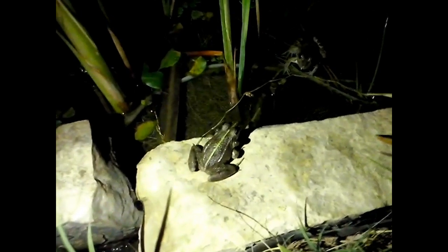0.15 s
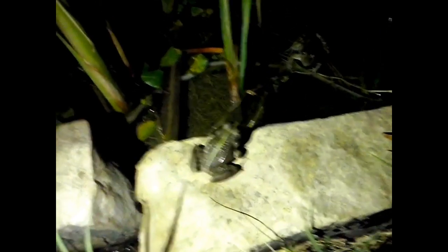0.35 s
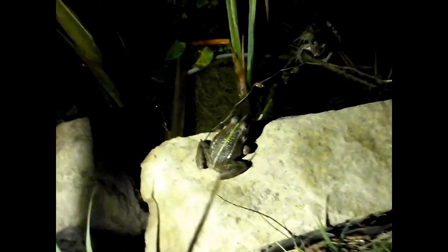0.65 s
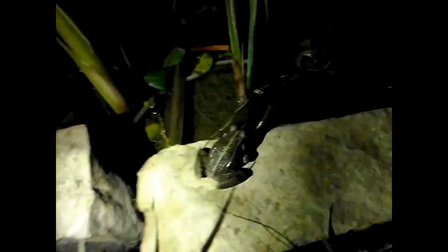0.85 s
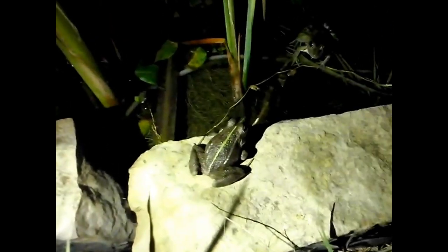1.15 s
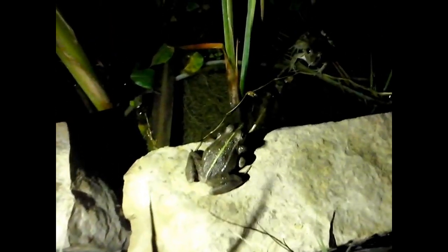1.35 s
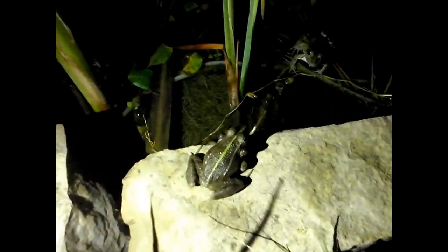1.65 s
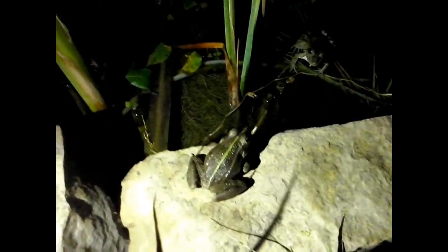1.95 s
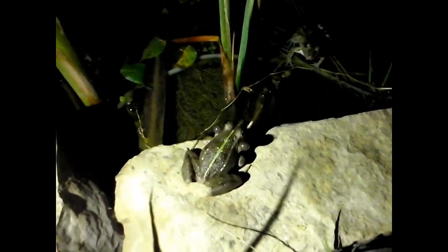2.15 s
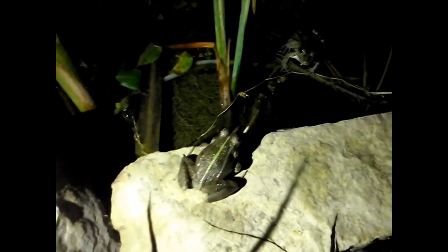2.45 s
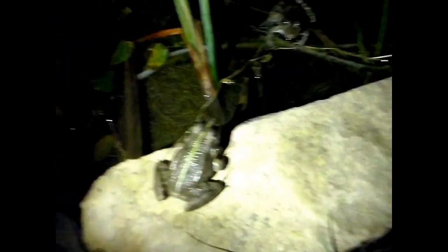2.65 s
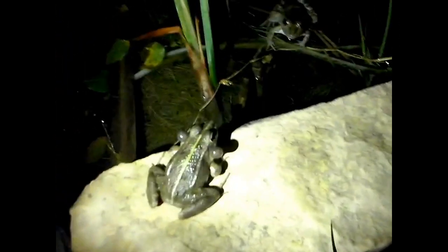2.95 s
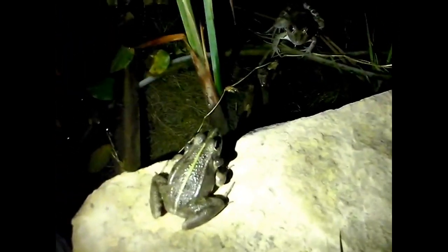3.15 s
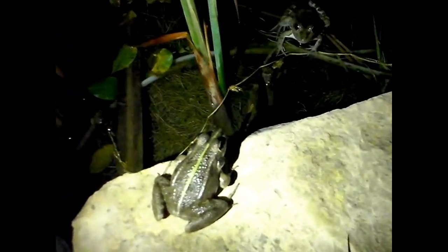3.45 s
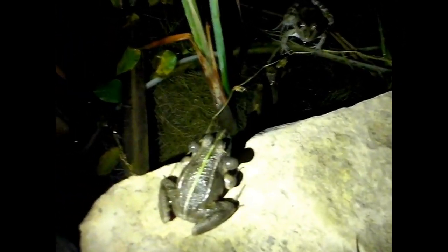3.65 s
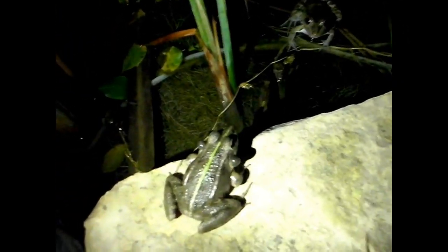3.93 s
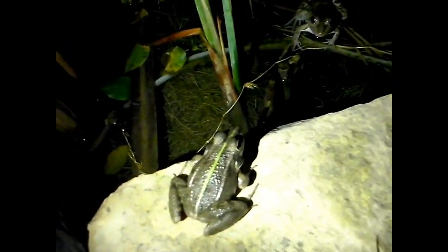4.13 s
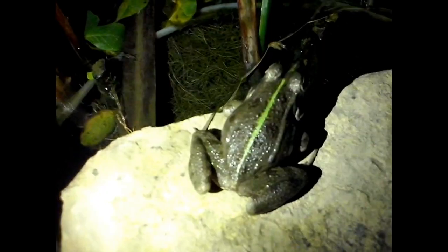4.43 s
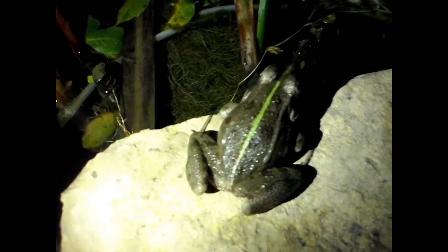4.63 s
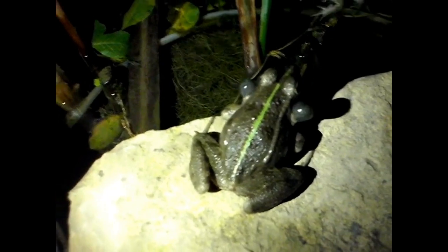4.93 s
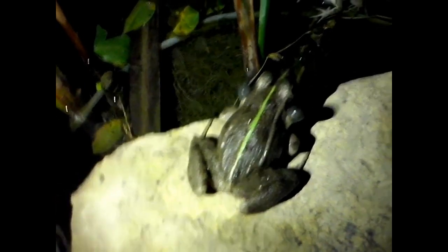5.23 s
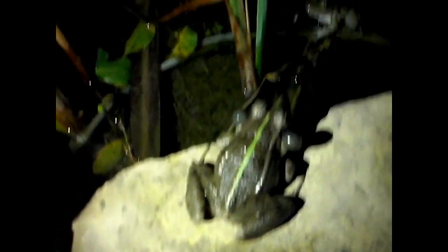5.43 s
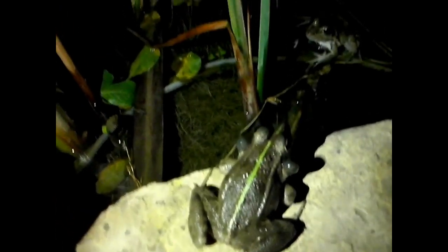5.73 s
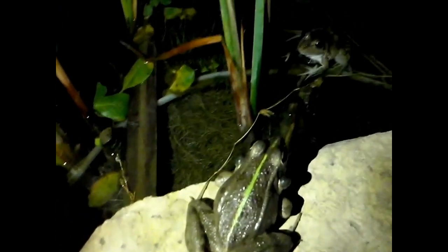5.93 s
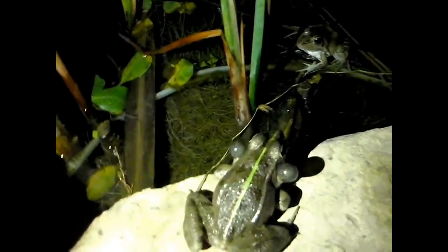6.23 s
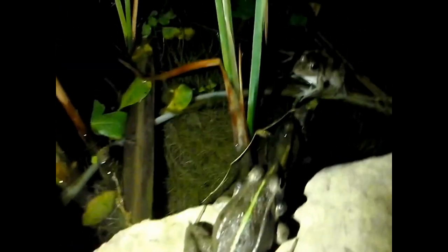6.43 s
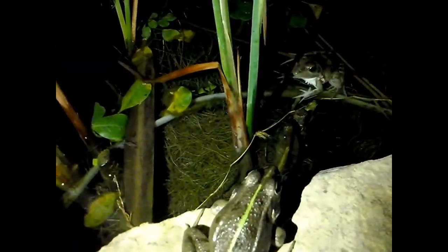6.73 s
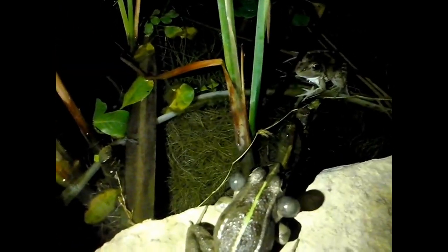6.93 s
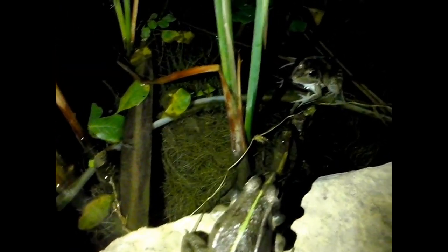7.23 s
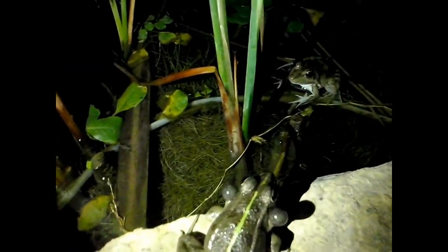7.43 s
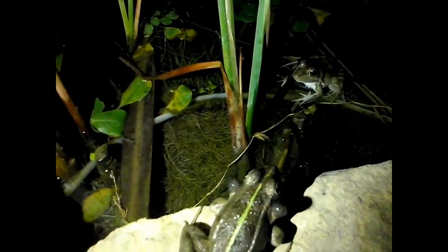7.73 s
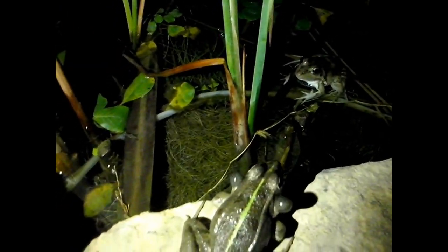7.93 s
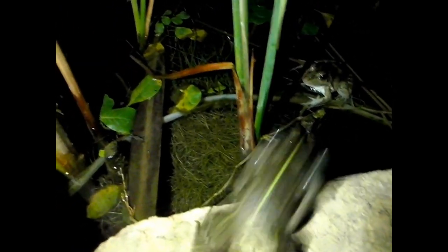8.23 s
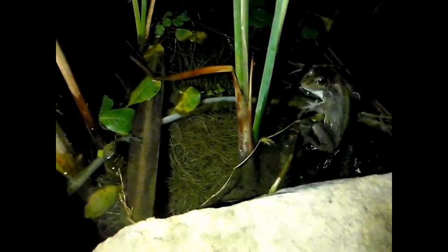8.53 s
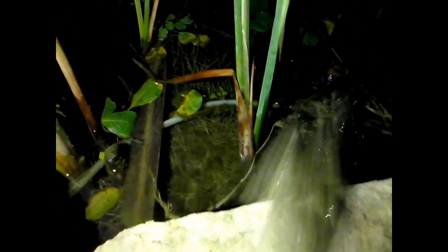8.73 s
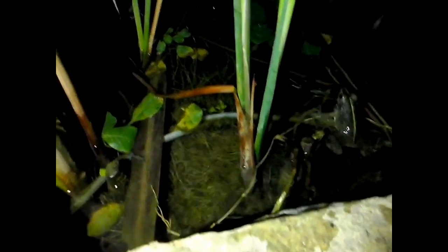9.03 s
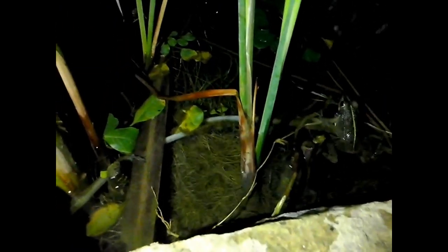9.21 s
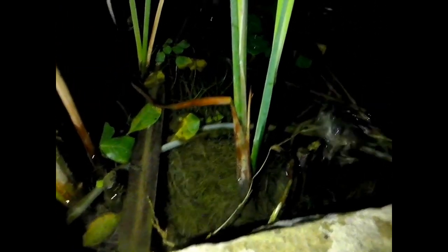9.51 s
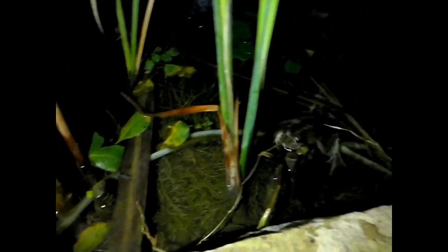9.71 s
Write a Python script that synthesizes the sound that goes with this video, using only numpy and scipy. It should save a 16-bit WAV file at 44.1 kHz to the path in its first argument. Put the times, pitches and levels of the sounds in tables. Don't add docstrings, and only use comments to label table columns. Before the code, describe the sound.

Loud, dry frog rattles repeat at uneven intervals over a constant buzzing mole-cricket trill. Early croaks are brief and throaty; later ones are longer, sharper and more forceful. Tiny water ticks and faint frog calls come from around the pond, with distant motors humming low. Outdoors, close, with short scattered echoes, a gritty overloaded microphone, metallic treble, and automatic gain dipping and raising the background.

```python
import sys
import numpy as np
from scipy import signal
from scipy.fft import rfft, irfft, next_fast_len
from scipy.io import wavfile
from scipy.ndimage import uniform_filter1d, map_coordinates

SR = 44100
rng = np.random.default_rng(int(sys.argv[2]) if len(sys.argv) > 2 else 0)


def dump(signal):
    limited = np.clip(np.atleast_2d(signal).T, -1, 1)
    pcm = np.round(limited * 32767).astype(np.int16)
    wavfile.write(sys.argv[1], SR, pcm)


def voltage_ratio(decibels):
    exponent = np.asarray(decibels, float) / 20
    return 10 ** exponent


N = 435266


def unit(x):
    return x / np.sqrt(np.mean(x ** 2) + 1e-20)


def along(points, hz):
    f, v = np.transpose(points)
    return np.interp(np.log(hz + 1), np.log(f + 1), v)


def curves(rows):
    s, *cols = np.transpose(rows)
    return [np.interp(np.arange(N) / SR, s, c) for c in cols]


def wobble(rate):
    knots = rng.standard_normal(int(N * rate / SR) + 4)
    return map_coordinates(knots, [np.arange(N) * rate / SR])


def filtered(x, response):
    m = next_fast_len(N + SR // 2)
    return irfft(rfft(x, m) * response(np.fft.rfftfreq(m, 1 / SR)), m)[:N]


def place(s, shapes):
    at = np.round(s * SR).astype(int)[:, None] + np.arange(shapes.shape[1])
    ok = (at >= 0) & (at < N)
    return np.bincount(at[ok], shapes[ok], N)


def space(x):
    # frequency in Hz, time to fade by 60 dB in s.
    pond_fade = [(300, 0.014), (2000, 0.063), (7000, 0.05)]
    out, size = np.zeros(N + SR), SR // 3
    for a in range(0, N, size):
        hz, t, z = signal.stft(rng.standard_normal(size), SR, nperseg=128)
        fade = voltage_ratio(-60 * t / along(pond_fade, hz)[:, None])
        tail = signal.istft(z * fade, SR, nperseg=128)[1]
        wet = signal.fftconvolve(x[a:a + size], tail / np.linalg.norm(tail))
        out[a + 60:][:len(wet)] += wet
    return out[:N]


def night_air_and_road(air_db, road_db):
    # frequency in Hz, level in dB per Hz.
    air_colour = [(140, -77), (230, -18.5), (618, -24), (748, -20), (1810, -20), (2360, -14), (2700, -23.5),
                  (3680, -29.5), (7040, -32), (7800, -52), (10100, -100), (17200, -120)]
    # frequency in Hz, level in dB per Hz.
    road_colour = [(15, -63), (25, -35), (59, -8.5), (91, -0.5), (146, -14.5), (194, -5), (260, -38),
                   (340, -73), (570, -120)]
    air = unit(filtered(rng.standard_normal(N), lambda f: voltage_ratio(along(air_colour, f))))
    road = unit(filtered(rng.standard_normal(N), lambda f: voltage_ratio(along(road_colour, f))))
    pump = voltage_ratio(-13 + 2.5 * wobble(20)) * np.sin(2 * np.pi * 749 * np.arange(N) / SR)
    air_gain = voltage_ratio(air_db + 14.0 + 0.96 * wobble(42))
    road_gain = voltage_ratio(road_db + 1.0 * wobble(9.4))
    return air_gain * (air + pump) + road_gain * road


def drone(rows, rough_db):
    hz, db = curves(rows)
    t = np.arange(N) / SR
    fade = np.clip(np.minimum(t - rows[0][0], rows[-1][0] + .03 - t) / 0.046, 0, 1)
    tone = np.sin(2 * np.pi * np.cumsum(hz) / SR)
    return np.sqrt(2) * fade * voltage_ratio(db + rough_db * wobble(36)) * tone


def far_motors():
    # time in seconds, pitch in Hz, level in dB.
    motors = [
        [(5.95, 113, -45), (6.068, 110.4, -46), (6.56, 113.1, -35)],
        [(6.85, 107, -43.5), (6.966, 110, -41.5), (7.2, 114, -48)],
        [(8.7, 98.6, -49), (8.764, 91.7, -41), (9.87, 92.5, -40.5)],
    ]
    return sum(drone(rows, rough_db=5.1) for rows in motors)


def gulp():
    # time in seconds, pitch in Hz, level in dB.
    pocket = [(9.72, 224.8, -51), (9.758, 238, -30.5), (9.87, 252, -29)]
    return drone(pocket, rough_db=0.67)


def far_frogs():
    # start in seconds, length in seconds, first pitch in Hz, last pitch in Hz, level in dB.
    calls = [
        (3.92, 0.15, 690, 1027, -33),
        (3.924, 0.12, 1930, 1630, -32),
        (4.095, 0.185, 1770, 1540, -36),
        (4.099, 0.051, 746, 1140, -35),
        (4.184, 0.082, 3680, 3000, -30),
        (9.64, 0.039, 1175, 1200, -33),
        (9.713, 0.048, 1068, 1000, -36),
        (9.749, 0.046, 459, 398, -29),
    ]
    lot = rng.random((70, 3))
    crowd = [(a * N / SR, .06, 850 + 700 * b, 800 + 750 * b, -46 + 7 * c) for a, b, c in lot]
    out = np.zeros(N + SR)
    for s, length, hz0, hz1, db in calls + crowd:
        u = np.linspace(0, 1, int(length * SR))
        grit = uniform_filter1d(rng.standard_normal(len(u)), size=90)
        rasp = .5 + 0.65 * np.sin(2 * np.pi * 60 * length * u) + 4.6 * grit
        glide = np.sin(2 * np.pi * np.cumsum(hz0 + (hz1 - hz0) * u) / SR)
        out[int(s * SR):][:len(u)] += voltage_ratio(db) * np.sin(np.pi * u) * rasp * glide
    return out[:N] + voltage_ratio(-6) * space(out[:N])


def drips():
    # time in seconds, peak level in dB, pitch in Hz.
    drops = [(0.2673, -45, 4170), (0.471, -46, 6150), (1.041, -58, 6100), (1.068, -34.5, 4920),
             (1.0913, -35, 5080), (1.117, -45, 5900), (1.317, -48, 4460), (1.523, -44, 7100),
             (1.7394, -43, 6700), (1.869, -42, 3300), (2.083, -46, 4670), (2.5686, -45, 6240),
             (2.6314, -42, 3400), (2.687, -40, 3330), (2.7625, -42, 3760), (2.8389, -45.5, 5840),
             (3.217, -31, 5260), (3.282, -46, 5170), (3.3487, -40.5, 5600), (3.4491, -43, 4900),
             (4.0445, -43, 6350), (5.9376, -36, 4000), (6.236, -36, 6700), (8.4693, -35, 4070),
             (8.9888, -24, 3820), (9.7149, -37, 4040), (9.7293, -30.5, 4240)]
    s, db, hz = np.transpose(drops)
    small = rng.random((260, 3))
    s = np.r_[s, small[:, 0] * N / SR]
    db = np.r_[db, -56 + 9 * small[:, 1]]
    hz = np.r_[hz, 900 + 6000 * small[:, 2] ** 1.5][:, None]
    t = np.arange(600) / SR
    bubble = np.sin(2 * np.pi * hz * (0.59 * t + 70 * t * t))
    bubble = bubble * voltage_ratio(-60 * t / 0.004) * (1 - np.exp(-t / 0.0022))
    noise = uniform_filter1d(rng.standard_normal((len(s), len(t))), size=14, axis=1)
    spray = noise * np.sin(2 * np.pi * hz * t)
    spray = spray * voltage_ratio(-60 * t / 0.034) * (1 - np.exp(-t / 0.00089))
    dry = place(s, voltage_ratio(db)[:, None] * (0.2 * bubble + 3 * spray))
    return voltage_ratio(15.0) * dry + voltage_ratio(-9.5) * space(dry)


def crickets(level_db):
    # wing tone in Hz, strokes per second, level in dB.
    singers = [(2345, 76.7, 0), (2300, 75.2, -11), (2130, 70, -20)]
    out = np.zeros(N)
    for hz, rate, db in singers:
        stroke = np.cumsum(rate * (1 + .002 * wobble(3))) / SR + rng.random()
        count = stroke.astype(int)
        luck = rng.standard_normal((count[-1] + 1, 2))
        pulse = np.sin(np.pi * np.clip((stroke - count) / 0.66, 0, 1)) ** 1.35
        pulse = pulse * voltage_ratio(1.6 * luck[count, 0])
        phase = 2 * np.pi * np.cumsum(hz * (1 + .005 * wobble(6))) / SR + 1.1 * luck[count, 1]
        out += voltage_ratio(db + 0.12 * wobble(2.2)) * pulse * np.sin(phase)
    return voltage_ratio(level_db) * unit(out + voltage_ratio(-4.0) * space(out))


def rattle():
    # first group in seconds, last group in seconds, number of groups,
    # slowing of the rattle from 0 to 1.
    call_times = [(.011, .128, 5, .08), (.701, .873, 7, .17), (2.261, 2.425, 7, .12),
                  (2.902, 3.093, 8, .08), (3.608, 3.834, 9, .14), (4.393, 4.42, 2, 0),
                  (4.615, 4.905, 12, .12), (5.064, 5.343, 11, .06), (5.646, 5.898, 10, .1),
                  (6.468, 6.776, 12, .1), (7.028, 7.408, 14, .07), (7.662, 8.253, 21, .04),
                  (8.282, 8.344, 3, .1), (8.514, 8.851, 12, .06), (9.144, 9.56, 15, .06)]
    # opening, early, late and closing pitch in Hz, groups they take to sag.
    sac_pitch = [(2470, 2360, 2470, 2000, 0.97), (2280, 2850, 2600, 1980, 1.2),
                 (2100, 2400, 2230, 1870, 0.55), (2160, 2620, 3160, 2070, 1.1),
                 (2170, 2840, 2890, 1860, 0.65), (2360, 2810, 3200, 2880, 1),
                 (2260, 3230, 3410, 2530, 0.54), (2450, 3410, 3530, 2990, 0.48),
                 (2400, 3250, 3300, 2570, 1.15), (2500, 3100, 3660, 3120, 1),
                 (2830, 3080, 3570, 2860, 0.91), (2860, 3120, 3380, 3234, 5.5),
                 (3060, 2900, 3200, 3170, 1.1), (2230, 2750, 3030, 2610, 0.72), (2430, 2760, 3550, 1850, 3)]
    # held level in dB, softer start in dB, softer end in dB,
    # growth in dB per click.
    push = [(0.5, 1.5, 11.5, 2), (6, 15, 15.5, 5.5), (4.5, 41, 5.5, 4.5), (8.5, 18, 9.5, 4),
            (9, 15.5, 8, 4.5), (9.5, 9, -1.5, 4.5), (9.5, 8, 7.5, 5), (9.5, 11.5, 4, 4.5), (11, 8, 11, 4.5),
            (12, 9.5, 3, 3), (10.5, 11.5, 1.5, 6), (9, 9.5, 11, 5.5), (9.5, 15.5, 10, 3), (11, 24, 4, 8),
            (10, 14, 2.5, 4)]
    swell_groups, fade_groups, fill_groups = 0.8, 0.23, 1.28
    step_at, step_width = 0.43, 0.051
    thinning, tiring_db = 0.57, 3.5
    rows = []
    for timing, pitches, efforts in zip(call_times, sac_pitch, push):
        first, final, n, slow = timing
        start, early, late, end, sag = pitches
        held, soft, fade, growth = efforts
        i = np.arange(round(n))
        u, left = i / i[-1], i[::-1]
        luck = rng.standard_normal((len(i), 5))
        usual_ms = 4 + .35 * growth
        last_ms = usual_ms * np.exp(.2 * luck[:, 0])
        gap_ms = 3.8 * np.exp(.1 * luck[:, 4])
        jitter_ms = (last_ms - usual_ms) / 2 + 1.2 * luck[:, 1]
        s = first + (final - first) * (u - slow * u * (1 - u)) + jitter_ms / 1000
        tight = early + (late - early) / (1 + np.exp((step_at - u) / step_width))
        filling = (early - start) * np.exp(-(i / fill_groups) ** 2)
        sagging = (late - end) * np.exp(-left / max(sag, .1))
        hz = (tight - filling - sagging) * (1 + .012 * luck[:, 3])
        tired = np.sin(np.pi * u ** 1.76) - .5
        db = held - soft * np.exp(-i / swell_groups) - fade * np.exp(-left / fade_groups)
        db = db - tiring_db * tired
        steep = growth * np.exp(thinning * tired + .22 * luck[:, 2]) + 3 * (i == 0)
        rows += zip(s, last_ms, gap_ms, steep, hz, db)
    return np.transpose(rows)[..., None]


def frog():
    # time in seconds, chest level in dB, head level in dB,
    # head pitch in Hz, echo level in dB.
    croak_colour = [(.07, 2.5, -40, 6360, -3), (.78, -2, -30, 7160, -4), (2.36, -2, -33, 6340, -4),
                    (3.0, -3.5, -43, 6800, -5), (3.75, -5, -23, 6350, -3), (4.4, -5, -52, 6950, -34),
                    (4.75, -13.5, -10.5, 6420, -12), (5.78, -11.5, -18.5, 6530, -13.5),
                    (6.62, -17, -16.5, 6470, -17), (8.239, -30, -11, 6620, -10), (8.27, -5, 2, 5150, -11.5),
                    (8.4, -7, -22, 4770, 10), (8.6, -15.5, -10, 5650, -14.5),
                    (8.85, -12, -14.5, 6030, -11.5), (9.3, -14, -15.5, 5970, -8.5),
                    (9.55, -14.5, -17, 5400, -13.5)]
    # share of the head pitch, time to fade by 60 dB in s, level in dB.
    head_tones = [(1, .008, 2), (.8, .006, -2), (.61, .005, 2)]
    # pitch in Hz, time to fade by 60 dB in s, level in dB.
    chest_tones = [(1129, 0.0031, 12), (1545, 0.004, 7.5), (2044, 0.008, 1)]
    # delay in ms, level in dB.
    bank_echoes = [(2.9, -14), (5.6, -18), (8.3, -21)]
    last, last_ms, gap_ms, growth, sac, effort = rattle()
    k = np.arange(16)
    luck = rng.standard_normal((len(last), 16, 2))
    s = last - (k > 0) * (last_ms + (k - 1) * gap_ms) / 1000
    alive = s > np.r_[-1, last[:-1, 0]][:, None] + .009
    keep = alive.ravel()

    when, *colour = np.transpose(croak_colour)
    chest_db, head_db, head_hz, _ = (np.interp(s, when, c).reshape(-1, 1)[keep] for c in colour)
    scatter_db = .8 * luck[..., 0]
    rise_db = 1.5 * growth * np.maximum(k - .6, 0) + .35 * k * k
    size = voltage_ratio(effort - rise_db + scatter_db).reshape(-1, 1)[keep]
    warmup = ((k > 3) * voltage_ratio(-22 - .8 * k + 4 * scatter_db)).reshape(-1, 1)[keep]

    t = np.arange(420) / SR
    detune = (1 + .012 * luck[..., 1]).reshape(-1, 1)[keep]

    def ring(hz, t60):
        tone = -np.sin(2 * np.pi * hz * detune * t)
        return tone * voltage_ratio(-60 * t / t60) * (1 - np.exp(-t / 0.00028))

    pitch = np.broadcast_to(sac, s.shape).reshape(-1, 1)[keep]
    sag = 1 + .05 * np.exp(-t / .001)
    sacs = 1.2 * ring(pitch * sag, 0.0064) + .5 * ring(.91 * pitch * sag, 0.0099)
    throat = voltage_ratio(-4) * ring(np.minimum(1800, .7 * pitch), 0.0066)
    head = voltage_ratio(head_db) * sum(voltage_ratio(db) * ring(share * head_hz, t60) for share, t60, db in head_tones)
    chest = sum(voltage_ratio(db) * ring(hz, t60) for hz, t60, db in chest_tones)
    clicks = size * (sacs + throat + head + voltage_ratio(chest_db) * chest) + warmup * chest

    def small_body(f):
        return (1j * f / (1j * f + 900)) ** 2 * f ** 8 / (f ** 8 + 880 ** 8)

    def bank(f):
        return 1 + sum(voltage_ratio(db) * np.exp(-2j * np.pi * f * ms / 1000) for ms, db in bank_echoes)

    dry = filtered(place(s.ravel()[keep], clicks), small_body)
    echo_db = curves(croak_colour)[3]
    return filtered(dry, bank) + space(dry * voltage_ratio(echo_db))


def loudness(croaks, band, seconds):
    power = filtered(np.clip(croaks, -1, 1), band) ** 2
    return np.abs(filtered(power, lambda f: 1 / (1 + 2j * np.pi * f * seconds)))


def scene():
    # time in seconds, level in dB.
    trill_level = [(0, -28.5), (1.8, -28.5), (2.7, -30), (4.2, -29), (5, -22.5), (6.3, -26.5), (8, -21.5),
                   (9.87, -26)]
    croaks = frog()
    duck_db = -9 * np.tanh(loudness(croaks, lambda f: f > 4000, 0.093) / 0.0072)
    lift_db = 7 * np.tanh(loudness(croaks, lambda f: f < 1500, 0.15) / 0.0055)
    trill_db = curves(trill_level)[0] + duck_db + lift_db
    gain_db = 1.36 * (trill_db + 29.0)
    background = night_air_and_road(gain_db - 58.5, gain_db - 47.0) + far_motors() + gulp()
    return (background + far_frogs() + drips() + crickets(trill_db) + croaks)[None]


def band_limit(x):
    return signal.sosfilt(signal.butter(12, 15710, fs=SR, output="sos"), x)


def record(dry):
    # frequency in Hz, level in dB.
    mirror = [(8050, -5), (8600, -1.5), (9400, -6), (11000, -13), (13000, -24.5), (13700, -31),
              (14500, -30), (15600, -73)]
    sampling_hz = 16000
    t = np.arange(N) / SR
    x = dry[0] / (1 + np.abs(dry[0]) ** 8) ** (1 / 8)
    x = x + 0.12 * x * x
    x = filtered(x, lambda f: 1j * f / (1j * f + 40) / np.sqrt(1 + (f / 7350) ** 40))

    def mirror_band(f):
        return voltage_ratio(along(mirror, f)) * (f > sampling_hz / 2) * (f < sampling_hz)

    image = filtered(2 * x * np.cos(2 * np.pi * sampling_hz * t), mirror_band)
    copy = filtered(image * np.cos(2 * np.pi * 790 * t), lambda f: voltage_ratio(-10) * (f > 14150) * (f < 15700))
    x = np.clip(x + image + copy, -1.04, 1.04)
    x = filtered(x, lambda f: 1 / np.sqrt(1 + (f / 15300) ** 30))
    return band_limit(x[None])


dry = scene()
out = record(dry)
dump(out)
```